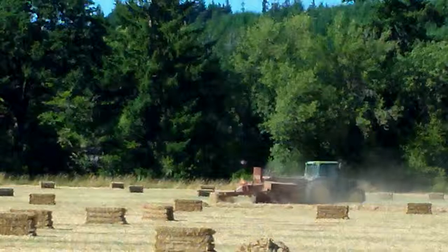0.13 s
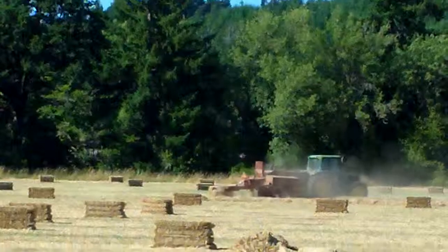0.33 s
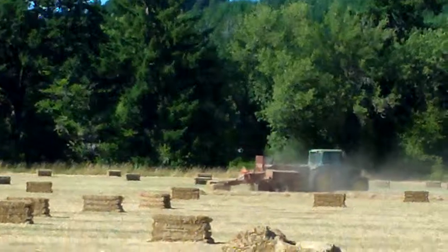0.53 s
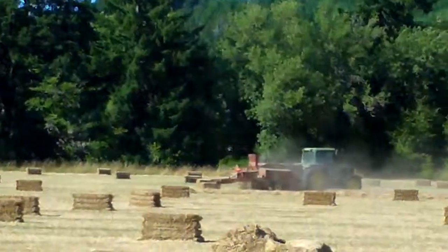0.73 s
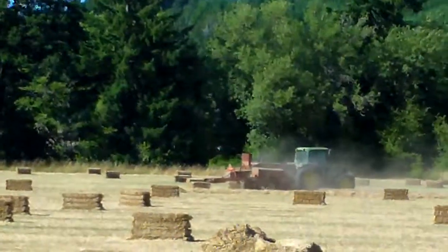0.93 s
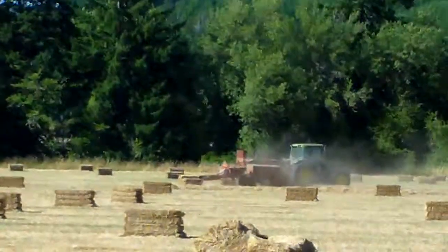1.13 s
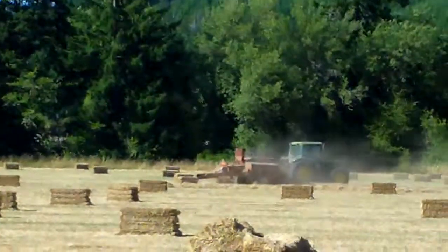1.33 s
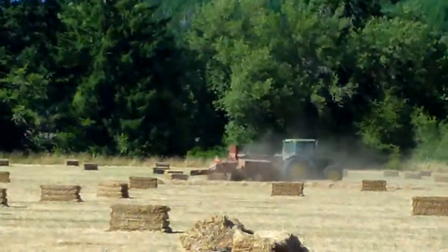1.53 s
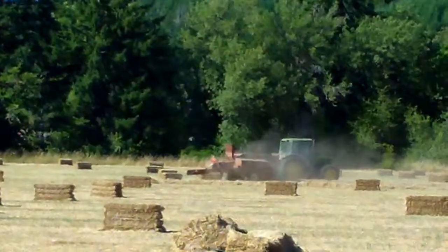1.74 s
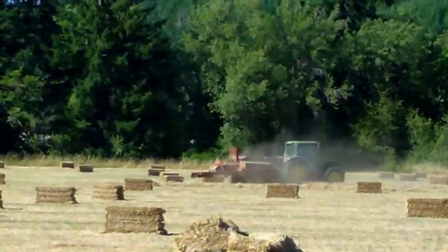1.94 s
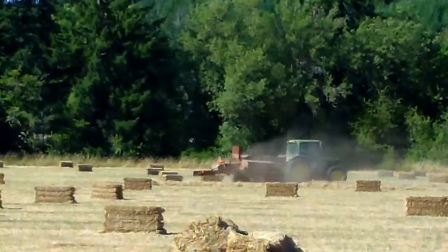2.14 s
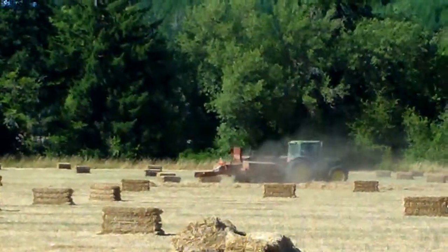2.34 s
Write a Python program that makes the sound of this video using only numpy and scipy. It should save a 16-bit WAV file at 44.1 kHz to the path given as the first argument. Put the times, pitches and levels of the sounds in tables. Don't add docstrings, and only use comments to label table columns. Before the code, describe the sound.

A distant tractor and hay baler drone and rattle in an open field; after brief silence, strong wind thumps hit the microphone, then metallic baler knocks swell, and gusts return over faint hiss.

```python
import sys
import numpy as np
from scipy import signal
from scipy.io import wavfile
from scipy.ndimage import uniform_filter1d

SR = 44100
rng = np.random.default_rng(int(sys.argv[2]) if len(sys.argv) > 2 else 0)


def volts_from_decibels(level):
    exponent = np.asarray(level, float) / 20
    return 10 ** exponent


def pcm_store(signal):
    levels = np.round(np.clip(np.atleast_2d(signal), -1, 1) * 32767)
    wavfile.write(sys.argv[1], SR, levels.astype(np.int16).T)


N = 110250
TIME_S = np.arange(N) / SR

# time_s, gain_db
GAIN_SETTLING = [(.19, 5.5), (.33, 4.5), (.4, 2.5), (.8, 2), (2.5, 3)]


def rms_one(x):
    return x / np.sqrt(np.mean(x ** 2) + 1e-20)


def in_time(rows):
    return np.interp(TIME_S, *np.transpose(rows))


def filtered(x, order, hz, kind):
    return signal.sosfilt(signal.butter(order, hz, kind, fs=SR, output="sos"), x)


def drift(rate_hz):
    hop = 40
    r = np.exp(-2 * np.pi * hop * rate_hz / SR)
    noise = rng.standard_normal(N // hop + 2002)
    slow = rms_one(signal.lfilter([1], [1, -2 * r, r * r], noise)[2000:])
    return np.interp(np.arange(N) / hop, np.arange(len(slow)), slow)


def banded(spectrum, patchy_db, rate_hz):
    hz, db = np.transpose(spectrum)
    octaves = np.log2(min(hz[-1], 16000) / hz[0])
    edges_hz = hz[0] * 2 ** np.arange(0, octaves + .2, 1 / 5)
    white = rng.standard_normal((2, N + 9000))
    together = drift(rate_hz)
    out = np.zeros(N)
    for k in range(len(edges_hz) - 1):
        band = filtered(white[k % 2], 3, edges_hz[k:k + 2], "band")[-N:]
        log_centre = np.log(edges_hz[k] * edges_hz[k + 1]) / 2
        level_db = np.interp(log_centre, np.log(hz), db)
        flicker_db = patchy_db * (.6 * together + drift(rate_hz))
        out += band * volts_from_decibels(level_db + flicker_db)
    return rms_one(out)


def resonance(hz, r):
    return [1, -2 * r * np.cos(2 * np.pi * hz / SR), r * r]


def wind_rumble():
    # time_s, level_db
    wind_level = [(.2, -32.5), (.31, -22.5), (.4, -37), (.54, -45), (.74, -43), (.88, -40), (1.05, -39.5),
                  (1.15, -45.5), (1.33, -41), (1.42, -48), (1.48, -29.5), (1.7, -37), (1.9, -34.5),
                  (2.1, -31), (2.32, -39), (2.5, -44)]
    # pitch_hz, density_db per Hz
    spectrum = [(12, -42), (20, 2), (65, -1.5), (111, -9.5), (150, -14), (172, -19.5), (300, -34.5),
                (390, -53), (660, -120)]
    rumble = banded(spectrum, patchy_db=1.5, rate_hz=12.0)
    power = uniform_filter1d(uniform_filter1d(rumble ** 2, size=3000), size=3000)
    return volts_from_decibels(in_time(wind_level)) * rumble / np.sqrt(power)


def wind_eddies():
    eddies = [(.2, -24, 98.6, 0.02), (0.228, -23.5, 48.7, 0.026), (0.259, -20, 114.5, 0.022),
              (.284, -16.5, 150, 0.011), (0.297, -13.5, 119.4, .011), (0.333, -16.5, 147, 0.0089),
              (0.355, -18.5, 67.6, 0.021), (0.386, -20, 103, .012), (0.492, -43, 81, 0.044),
              (0.865, -30, 54.5, 0.044), (1.229, -34, 101.6, 0.035), (1.492, -19.5, 85, 0.017),
              (1.516, -24, 151, 0.024), (1.553, -30.5, 146, 0.032), (1.573, -28, 205, 0.013),
              (1.584, -24.5, 110, 0.025), (1.631, -31, 59.6, 0.044), (1.665, -28.5, 201, 0.017),
              (1.679, -38, 242, 0.023), (1.492, -27, 211, 0.011), (1.766, -28.5, 75, 0.02),
              (1.821, -19, 93.5, 0.036), (1.841, -25, 130, 0.014), (1.931, -25.5, 153, .024),
              (1.986, -25.5, 97, 0.019), (2.026, -24.5, 108.6, .015), (2.168, -22, 61, 0.027),
              (2.21, -25.5, 95, 0.011), (2.271, -34, 94, 0.013), (2.317, -33.5, 54.3, 0.022)]
    skew, glide_depth, puff_db = 0.37, 0.38, -15.5
    puff = rms_one(filtered(rng.standard_normal(N), 3, [130, 267.7], "band"))
    luck = rng.uniform(-1.096, 1, (len(eddies), 2))
    out = np.zeros(N)
    for (start_s, peak_db, hz, length_s), (phase, glide) in zip(eddies, luck):
        since_s = TIME_S - start_s
        u = since_s / length_s
        bend = 1 + glide_depth * glide * np.clip(u, -1, 1) / 2
        turn = 2 * np.pi * hz * since_s * bend + .5 * phase
        edge = np.clip(skew * volts_from_decibels((peak_db + 14.5) / 2), 0, .7)
        swing = (edge ** 2 - 1) * np.sin(turn) / (1 + edge ** 2 - 2 * edge * np.cos(turn))
        swing = swing + volts_from_decibels(puff_db) * (hz / 120) ** 1.6 * puff
        out += volts_from_decibels(peak_db) * np.exp(-3.5 * u ** 2) * swing
    return out


def gears():
    # pitch_hz, width_hz, level_db
    whine = [(1108, 15, -67.5), (1803, 47, -70.5), (2092, 21, -69)]
    out = np.zeros(N)
    for hz, width_hz, level_db in whine:
        r = np.exp(-np.pi * width_hz / SR)
        tone = signal.lfilter([1, 0, -1], resonance(hz, r), rng.standard_normal(N))
        out += volts_from_decibels(level_db) * rms_one(tone)
    return out


def firing():
    rate_hz, depth, t60_s = 71.93, 0.36, 0.056
    jitter_s, spread_db = .0008, 1
    start_s = np.arange(0, N / SR - .01, 1 / rate_hz)
    luck = rng.standard_normal((2, len(start_s)))
    clicks = np.zeros(N)
    clicks[(np.abs(start_s + jitter_s * luck[0]) * SR).astype(int)] = volts_from_decibels(spread_db * luck[1])
    knocks = signal.lfilter([1], [1, -volts_from_decibels(-60 / (t60_s * SR))], clicks + 1e-18)
    return rms_one(1 - depth + depth * rms_one(knocks))


def tractor():
    # time_s, level_db
    carry = [(.19, -57), (.32, -60), (.4, -68.5), (.47, -60.5), (.6, -52), (.7, -48), (.8, -46), (.9, -46),
             (1.0, -51), (1.1, -56), (1.35, -56.5), (1.43, -62), (1.55, -53.5), (1.63, -58.5),
             (1.86, -55.5), (1.95, -59), (2.2, -60), (2.5, -62.5)]
    # pitch_hz, density_db per Hz
    clatter_spectrum = [(900, -44), (1500, -10), (2500, -1.5), (3700, -3), (4200, 5), (4700, -1),
                        (5200, -9.5), (7500, -31.5)]
    # pitch_hz, density_db per Hz
    drone_spectrum = [(180, -17), (300, -3.5), (500, -3.5), (1100, -1.5), (1500, -3.5), (2200, -7.5),
                      (3200, -10), (5000, -8)]
    carry_db = in_time(carry)
    swell_db = carry_db - carry_db.mean()
    gating = firing() ** np.clip(1 + .04 * swell_db, .5, 1.6)
    clatter = volts_from_decibels(carry_db + 4) * gating * banded(clatter_spectrum, patchy_db=.9, rate_hz=12.0)
    drone_db = -51.5 + 0.26 * swell_db + .8 * in_time(GAIN_SETTLING)
    drone = volts_from_decibels(drone_db) * banded(drone_spectrum, patchy_db=1.1, rate_hz=8.0)
    return clatter + drone


def plunger():
    # start_s, peak_db, t60_s
    knocks = [(0.639, -42, .08), (.734, -30, 0.09), (.786, -25, 0.11), (0.804, -38, 0.054),
              (0.822, -31.5, 0.073), (.861, -32, 0.064), (0.892, -33, 0.052), (1.306, -42.5, .07),
              (1.467, -41, .08), (1.51, -34, 0.19), (1.54, -42, .1), (2.199, -45, 0.11),
              (2.246, -35, 0.071), (2.331, -50, 0.081)]
    # pitch_hz, level_db, t60_s
    chamber = [(1250, -11.5, 0.21), (1647, -6, 0.11), (2290, -14.5, 0.14), (2650, -21, 0.033),
               (3210, -14, 0.033), (3470, -15, 0.033), (4066, 0.5, 0.12), (4180, -5, 0.24),
               (4660, -8, 0.044), (5600, -23, .08), (5800, -24, .04), (6940, -54, .04)]
    # pitch_hz, density_db per Hz
    crash_spectrum = [(900, -32), (1800, -14), (2500, -15), (3300, -9.5), (4100, 1), (4700, -4.5),
                      (5300, -17), (7500, -31)]
    ring_db, crash_db, rise_s, bounce_s = -18.5, -5.5, .0006, .006
    hard_low_db, air_cut_hz = 5.5, 7000
    start_s, peak_db, crash_t60_s = np.transpose(knocks)[:, :, None]
    bounce = np.arange(3)
    luck = rng.standard_normal((len(start_s), 3, len(chamber) + 1))
    hit_s = start_s + bounce_s * bounce * (1 + .2 * luck[:, :, -1])

    out = np.zeros(N)
    for k, (hz, level_db, t60_s) in enumerate(chamber):
        hard_db = hard_low_db * (peak_db + 31) / 5 * (hz < 3000)
        late_s = hit_s + rise_s * np.abs(luck[:, :, k - 1])
        hit_db = peak_db + level_db + hard_db + ring_db - 2 * bounce + 3 * luck[:, :, k]
        clicks = np.full(N, 1e-18)
        clicks[(late_s * SR).astype(int)] = volts_from_decibels(hit_db)
        r = volts_from_decibels(-60 / (t60_s * SR))
        ring = signal.lfilter([0, np.sin(2 * np.pi * hz / SR)], resonance(hz, r), clicks)
        out += ring * (-1) ** k

    crash = banded(crash_spectrum, patchy_db=0, rate_hz=30.0)
    crash = crash / np.sqrt(uniform_filter1d(crash ** 2, size=150) + .05)
    age_s = np.maximum(TIME_S - start_s, 0)
    shape = volts_from_decibels(peak_db + crash_db - 60 * age_s / crash_t60_s) * (1 - np.exp(-age_s / rise_s))
    out += np.sqrt((shape ** 2).sum(axis=0)) * crash
    return filtered(out, 4, air_cut_hz, "low")


def scene():
    wind = wind_rumble() + wind_eddies()
    machine = gears() + tractor() + plunger()
    return (wind + machine)[None]


def roll_off(x):
    return signal.sosfilt(signal.butter(12, 16650, fs=SR, output="sos"), x)


def record(dry):
    start_s, fade_s, cutoff_hz = .191, .0005, 15700
    hiss_db = -65.5 + in_time(GAIN_SETTLING)
    hiss = volts_from_decibels(hiss_db) * filtered(rng.standard_normal(N), 1, 297, "high")
    switched_on = np.clip((TIME_S - start_s) / fade_s, 0, 1)
    top_cut = signal.ellip(14, .5, 70, cutoff_hz, fs=SR, output="sos")
    mix = signal.sosfilt(top_cut, (dry + hiss) * switched_on)
    return roll_off(mix)


dry = scene()
out = record(dry)
pcm_store(out)
```